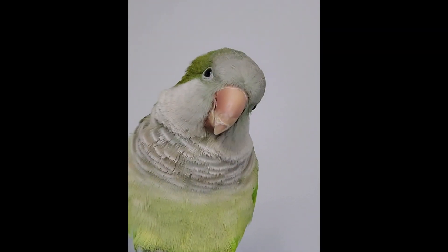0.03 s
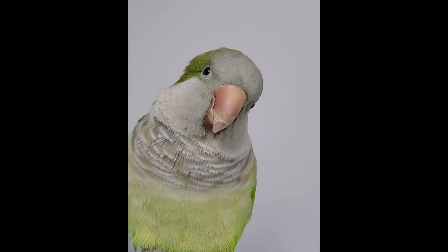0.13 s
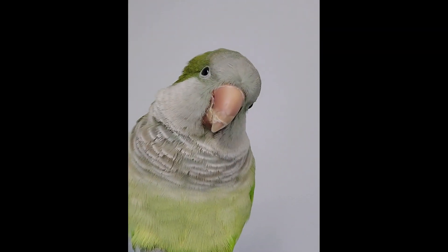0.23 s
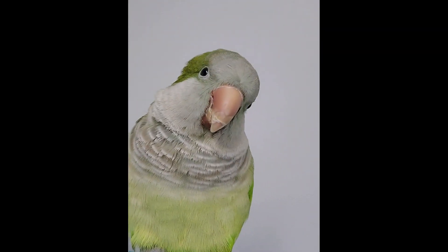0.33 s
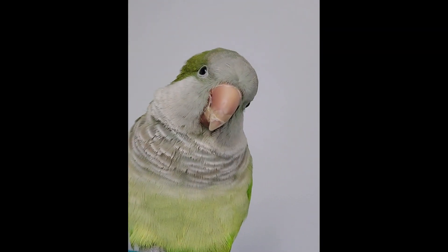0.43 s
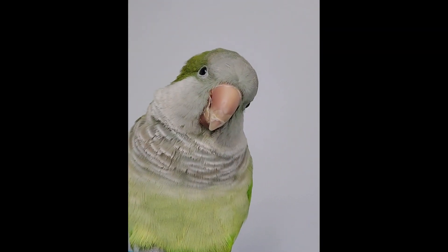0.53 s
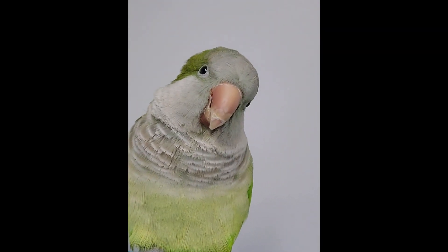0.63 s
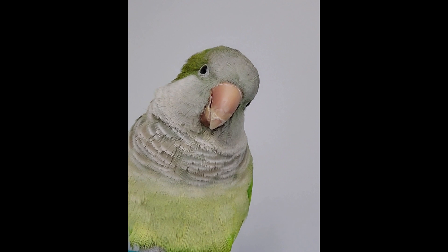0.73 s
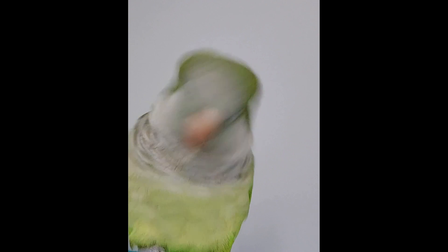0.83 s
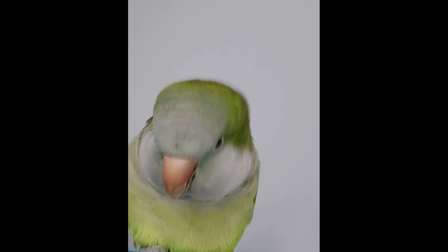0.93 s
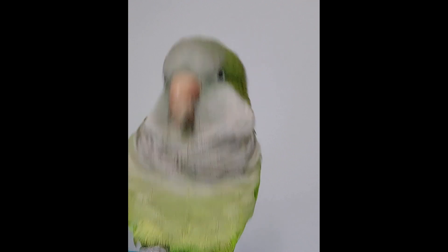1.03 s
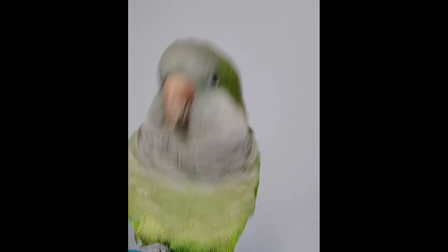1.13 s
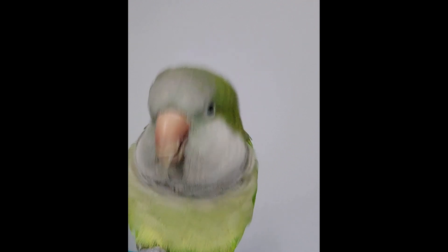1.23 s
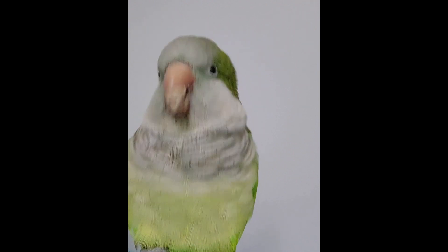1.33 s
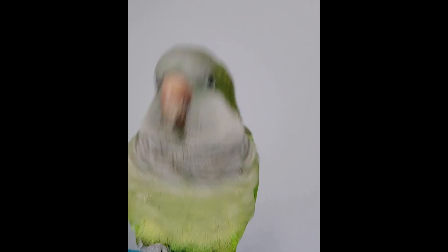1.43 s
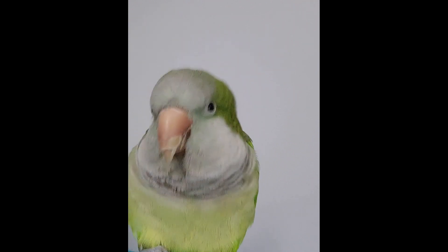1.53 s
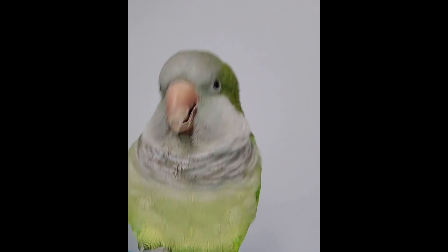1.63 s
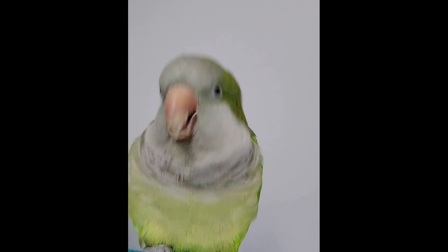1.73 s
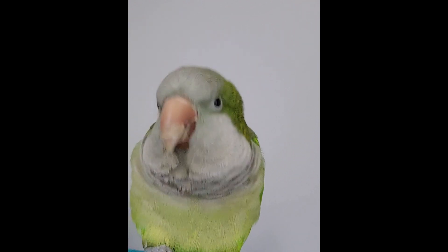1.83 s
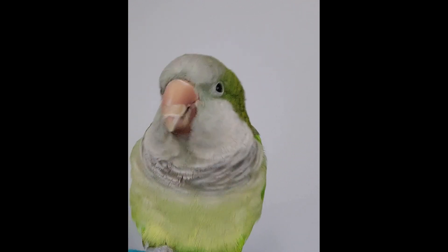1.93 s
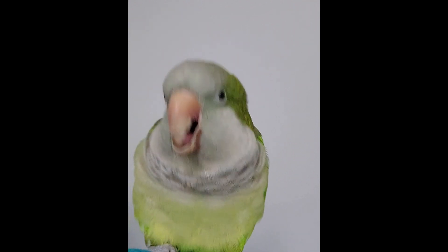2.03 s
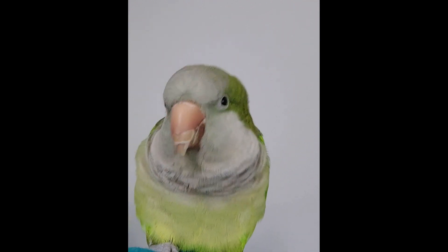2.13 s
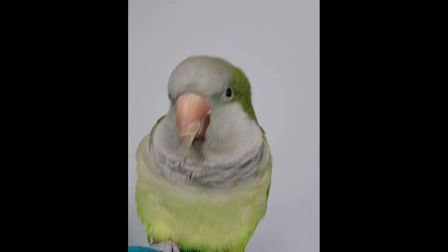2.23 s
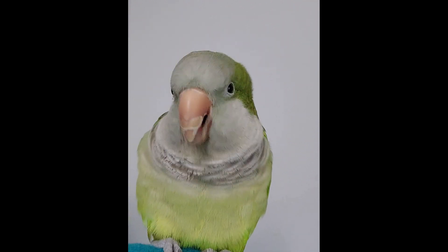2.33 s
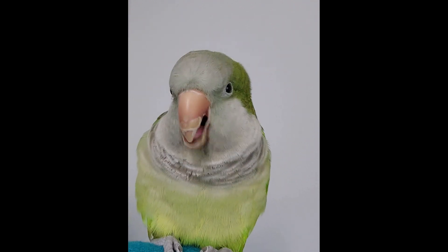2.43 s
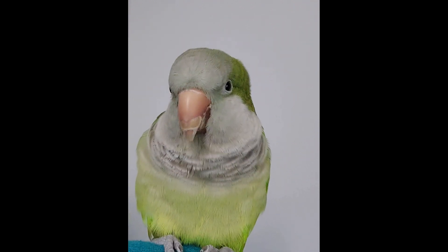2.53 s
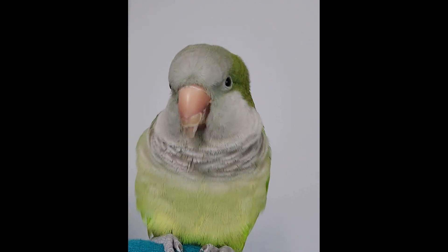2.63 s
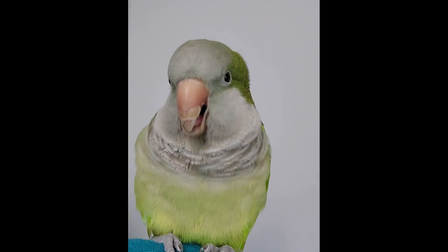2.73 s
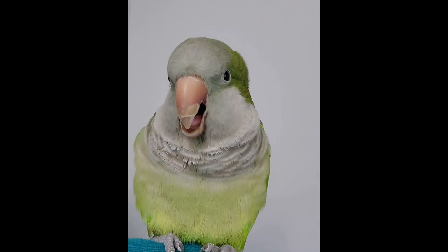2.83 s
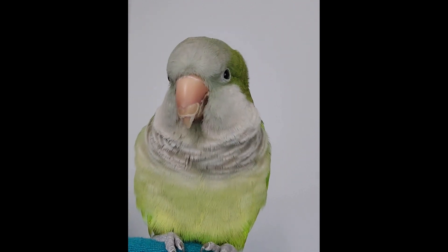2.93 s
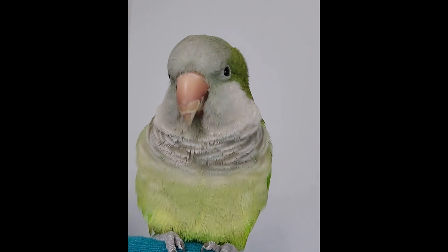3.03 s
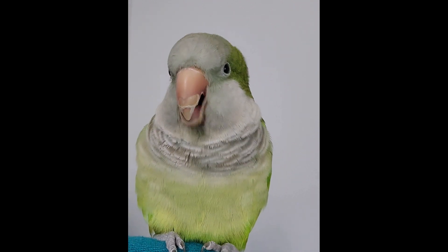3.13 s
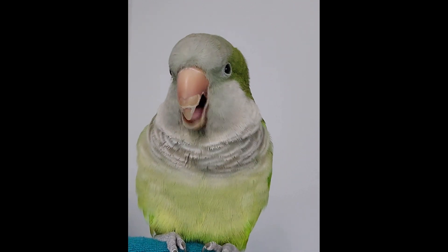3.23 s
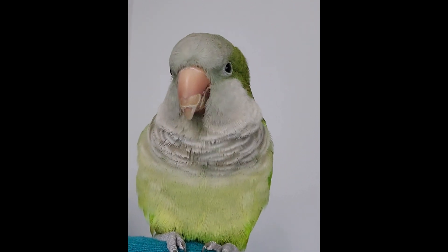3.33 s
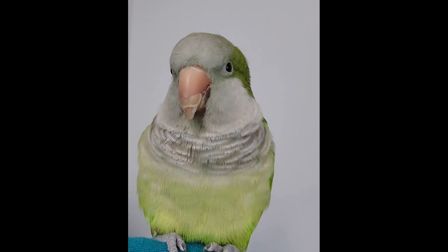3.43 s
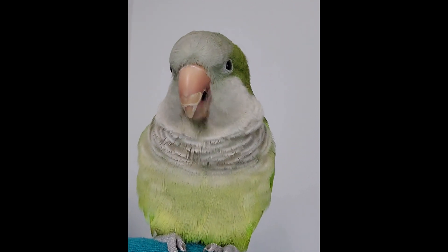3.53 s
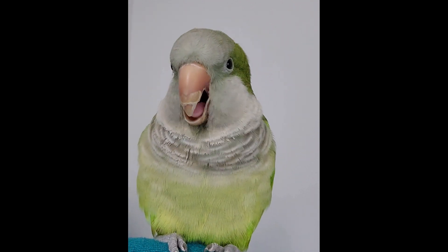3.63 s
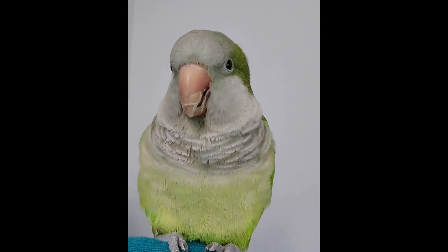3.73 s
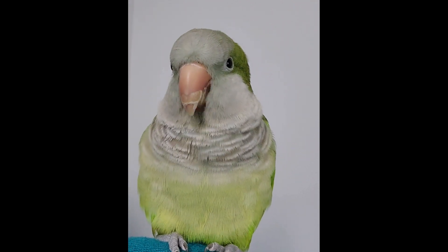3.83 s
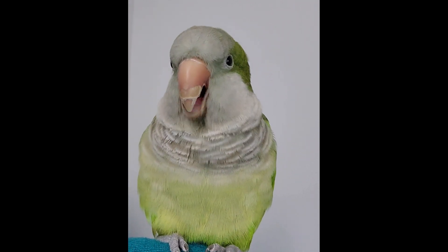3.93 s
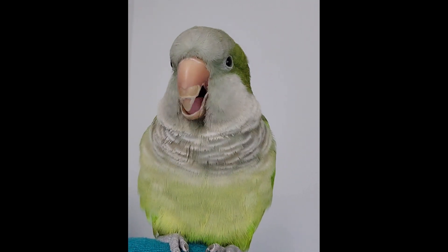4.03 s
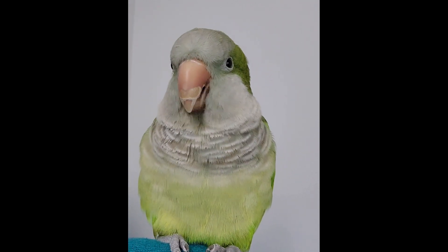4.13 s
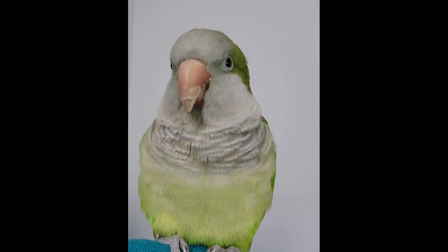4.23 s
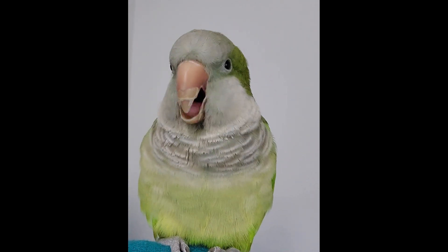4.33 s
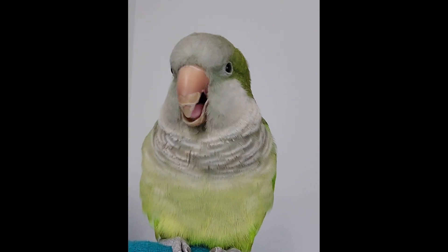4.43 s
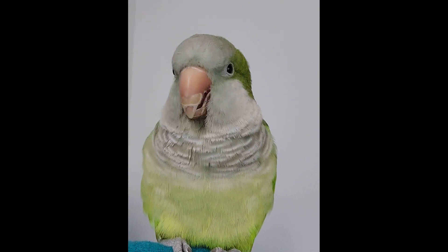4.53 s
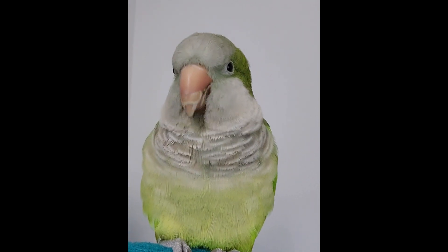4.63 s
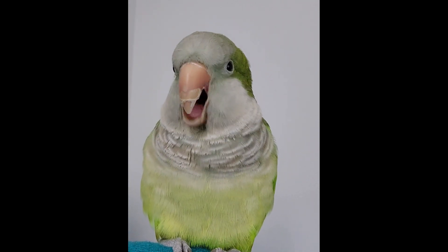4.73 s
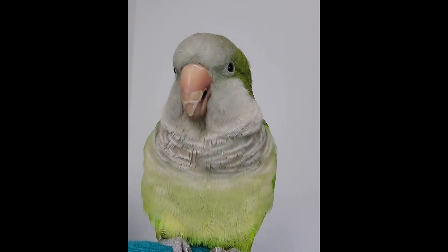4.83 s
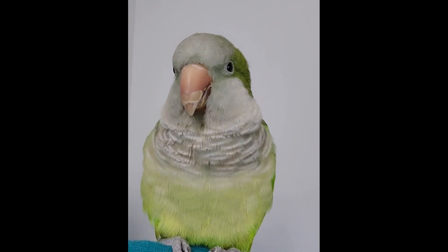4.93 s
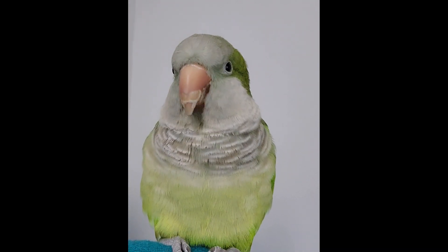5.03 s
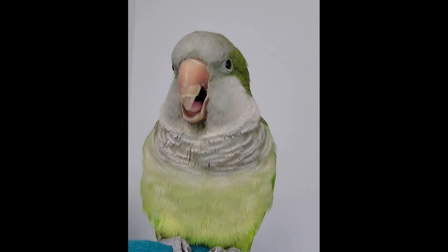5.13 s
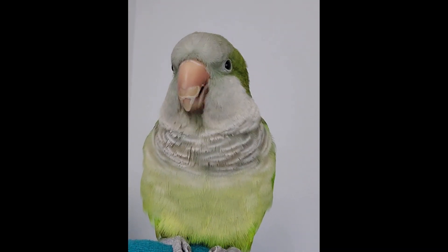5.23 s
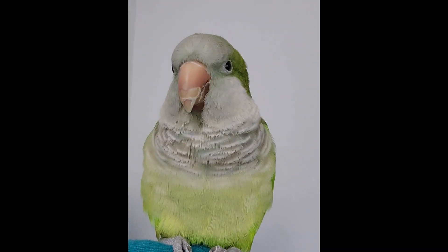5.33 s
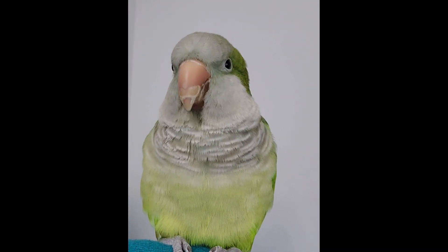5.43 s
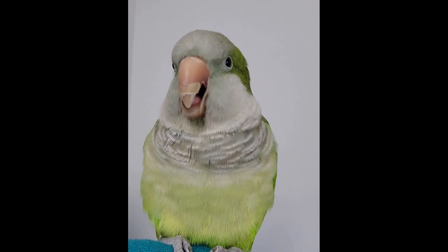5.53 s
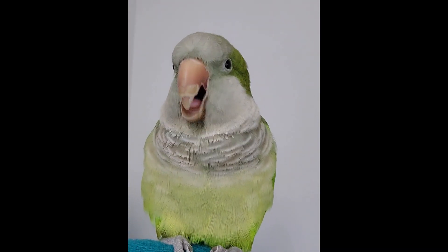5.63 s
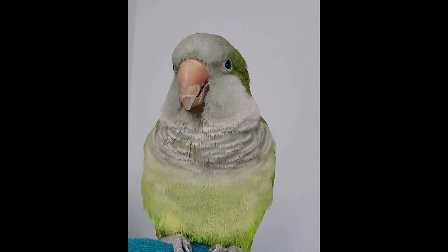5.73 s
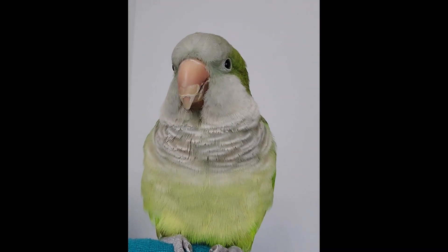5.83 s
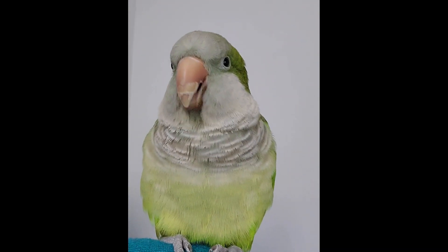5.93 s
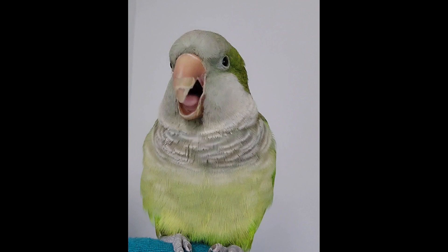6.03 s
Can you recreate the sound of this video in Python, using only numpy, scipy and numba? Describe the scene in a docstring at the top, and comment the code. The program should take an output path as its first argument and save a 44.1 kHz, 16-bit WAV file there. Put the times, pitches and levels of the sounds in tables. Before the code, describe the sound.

A small parrot gives a fast, regular run of short harsh squawks, close by in a quiet room.

```python
"""A small parrot gives fourteen harsh squawks, close to a phone in a quiet furnished room.
Each is a train of sharp syrinx pulses, rung through throat and beak; the pitch arches up, then sags
into a rasp. Nearby surfaces and a short room tail colour the voice.
A faint rumble, hiss and whine lie underneath."""
import sys
import numpy as np
from scipy import signal
from scipy.fft import rfft, irfft, next_fast_len
from scipy.io import wavfile
from scipy.ndimage import uniform_filter1d
from numba import njit

SR = 44100
rng = np.random.default_rng(int(sys.argv[2]) if len(sys.argv) > 2 else 0)


def to_wav(sig):
    """Store sig (one row per channel, or 1-D mono) as 16-bit WAV at the path in sys.argv[1].

    Samples outside -1..1 are clipped; the rate is SR.
    """
    pcm = np.clip(np.atleast_2d(sig), -1, 1) * 32767
    pcm = np.round(pcm).astype(np.int16)
    wavfile.write(sys.argv[1], SR, pcm.T)  # frames by channels


N = 268921
TIME_S = np.arange(N) / SR
FFT_SIZE = next_fast_len(N + SR, True)
FREQ_HZ = np.arange(FFT_SIZE // 2 + 1) * SR / FFT_SIZE


def undb(db):
    """Decibels to gain."""
    return 10 ** (np.asarray(db) / 20)


def curve_db(points):
    """Interpolate (freq_hz, gain_db) points on a log-frequency axis."""
    hz, db = np.transpose(points)
    return np.interp(np.log(FREQ_HZ + 1), np.log(hz), db)


def minimum_phase(gain_db):
    """Response that rings after a pulse, never before."""
    cepstrum = irfft(gain_db * np.log(10) / 20, FFT_SIZE)
    cepstrum[1:FFT_SIZE // 2] *= 2
    cepstrum[FFT_SIZE // 2 + 1:] = 0
    return np.exp(rfft(cepstrum))


def delay(lag_s):
    """Response of a pure delay."""
    return np.exp(-2j * np.pi * FREQ_HZ * lag_s)


def filtered(x, response):
    """Apply a frequency response."""
    return irfft(rfft(x, FFT_SIZE) * response, FFT_SIZE)[..., :N]


def unit_rms(x, window_samples=900):
    """Hold the running rms at 1."""
    power = uniform_filter1d(uniform_filter1d(x * x, window_samples), window_samples)
    return x / np.sqrt(np.abs(power) + 1e-12)


def wobble(rate_hz):
    """Low-passed noise, standard deviation 1."""
    x = signal.sosfilt(signal.butter(2, rate_hz, fs=SR, output="sos"), rng.standard_normal(N))
    return x / x.std()


def ease(time_s, span_s, curve=2):
    """Rise from 0 to 1 over the span, then hold."""
    return 1 - np.clip(1 - time_s / span_s, 0, 1) ** curve


@njit
def resonator(x, centre_hz, width_hz):
    """State-variable band-pass, unity gain at its moving centre."""
    y, band_state, low_state = np.empty(len(x)), 0., 0.
    for i in range(len(x)):
        g = np.tan(np.pi * centre_hz[i] / SR)
        damping = width_hz / centre_hz[i]
        band = (band_state + g * (x[i] - low_state)) / (1 + g * (g + damping))
        band_state = 2 * band - band_state
        low_state += 2 * g * band
        y[i] = damping * band
    return y


# background spectrum: freq_hz, relative_db
HUSH_SPECTRUM = [(20, -11.5), (40, -10.5), (60, -5), (110, -13.5), (190, -21.5), (320, -15), (500, -20.5),
                 (2000, -24.5), (3300, -28.5), (4300, -33.5), (6200, -32.5), (7500, -48.5), (16000, -60)]
# drift of hiss and whine: time_s, gain_db
HISS_DRIFT = [(0, -2), (1.5, 2), (2.5, -1.5), (6.1, -6)]

def hush(level_db=-69.5, side_db=-8, flicker_db=1, pan_db=-2.0, rumble_hz=200):
    """Rumble and fainter hiss of the home, mostly alike in both channels."""
    mid, side = filtered(rng.standard_normal((2, N)), undb(curve_db(HUSH_SPECTRUM)))
    sign = np.array([[1], [-1]])
    stereo = (mid + undb(side_db) * side * sign) / mid.std() * undb(sign * pan_db / 2)
    rumble = filtered(stereo, 1 / (1 + (FREQ_HZ / rumble_hz) ** 2))
    hiss = (stereo - rumble) * undb(np.interp(TIME_S, *np.transpose(HISS_DRIFT)))
    return (rumble + hiss) * undb(level_db + flicker_db * wobble(7.9))


def whine(pitch_hz=4330, level_db=-91.5):
    """Thin, slightly unsteady tone whose level follows the hiss."""
    cycles = np.cumsum(pitch_hz * (1 + .002 * wobble(30))) / SR
    drift_db = np.interp(TIME_S, *np.transpose(HISS_DRIFT))
    return np.sqrt(2) * np.sin(2 * np.pi * cycles) * undb(level_db + drift_db)


# reverberation bands: freq_hz, t60_s, gain_db
ROOM_BANDS = [(300, 0.57, -32), (1200, 0.15, -22.5), (3500, 0.27, -18.5), (7000, .33, -29),
              (14000, 0.2, -30)]

def room_tail(voice, build_s=0.0027):
    """Diffuse reverberation, different in each channel, longest in the bass."""
    band_hz, t60_s, gain_db = np.transpose(ROOM_BANDS)
    t = TIME_S[:SR // 2]
    noise = rfft(rng.standard_normal((2, len(t))))
    log_freq = np.log(np.fft.rfftfreq(len(t), 1 / SR) + 1)
    impulse = 0
    for weights, band_t60_s, gain in zip(np.eye(len(band_hz)), t60_s, undb(gain_db)):
        decay = np.exp(-np.log(1000) * t / band_t60_s) * (1 - np.exp(-(t / build_s) ** 2))
        band = irfft(noise * np.interp(log_freq, np.log(band_hz), weights), len(t))
        impulse = impulse + gain * band * decay / np.sqrt(np.sum(decay ** 2))
    return filtered(voice, rfft(impulse, FFT_SIZE))


def scatter(voice, level_db=-13, t60_s=0.13, first_s=0.0053, highpass_hz=1800):
    """Body, perch and phone scatter the short waves and blur each pulse."""
    t = TIME_S[:SR // 10]
    impulse = rng.standard_normal((2, len(t))) * np.exp(-np.log(1000) * t / t60_s) * (t > first_s)
    impulse /= np.sqrt(np.sum(impulse ** 2, axis=1, keepdims=True))
    highpass = FREQ_HZ / np.hypot(FREQ_HZ, highpass_hz)
    return undb(level_db) * filtered(voice, rfft(impulse, FFT_SIZE) * highpass)


# balance of the two microphone ports: freq_hz, left_minus_right_db
PORT_BALANCE = [(300, 1), (700, 7.5), (1200, 5.5), (1600, 3.5), (2350, -3), (2750, 8), (3100, -3.5),
                (3500, 6), (4200, 3.5), (4800, -6), (6400, -17.5), (7100, 12), (7900, 6.5), (9400, 15.5),
                (12200, 1.5), (15000, -3.5)]
# echoes off perch, wall and table: delay_s, left_db, right_db
REFLECTIONS = [(.0023, -16.5, -15), (.0052, -21.5, -19), (.0087, -26, -13), (0.0135, -18, -12)]

def near_field(voice, right_lag_s=0.0002511):
    """Direct sound reaches the left port first; close reflections follow."""
    balance_db = curve_db(PORT_BALANCE)
    mean_db = 10 * np.log10(np.cosh(balance_db * np.log(10) / 20))
    left = minimum_phase(balance_db / 2 - mean_db)
    right = minimum_phase(-balance_db / 2 - mean_db) * delay(right_lag_s)
    echoes = sum(undb([[left_db], [right_db]]) * delay(delay_s)
                 for delay_s, left_db, right_db in REFLECTIONS)
    return filtered(voice, np.array([left, right]) * (1 + echoes))


# overall slope of the voice: freq_hz, gain_db
VOICE_SLOPE = [(200, -44.5), (450, -21.5), (620, -18), (800, -2), (1100, -2.5), (2200, -5), (3600, -5.5),
               (5200, 1), (8000, -8.5), (10000, -8), (16000, -14.5)]
# peaks and hollows of windpipe and head: centre_hz, width_hz, gain_db
WINDPIPE_PEAKS = [(1410, 280, 4.5), (2030, 170, -4), (2340, 180, 7), (2620, 170, -4), (3100, 200, 2),
                  (4130, 260, 3), (5100, 200, -3), (5850, 400, -5), (7050, 400, 5), (8050, 400, -5),
                  (9500, 700, 2), (13550, 650, -24), (14900, 1100, 7)]
# bounces along the windpipe: round_trip_s, reflected_share
WINDPIPE_BOUNCES = [(.00035, 0.7), (.00058, 0.43)]

def windpipe():
    """Static response of the airway; repeated bounces spread each pulse in time."""
    peaks_db = sum(gain_db / (1 + (2 * (FREQ_HZ - centre_hz) / width_hz) ** 2)
                   for centre_hz, width_hz, gain_db in WINDPIPE_PEAKS)
    response = minimum_phase(curve_db(VOICE_SLOPE) + peaks_db)
    for round_trip_s, share in WINDPIPE_BOUNCES:
        trip = delay(round_trip_s)
        response = response * (trip - share) / (1 - share * trip)  # all-pass
    return response


# throat resonances and side-cavity hollow: shut_hz, open_hz, width_hz, gain_db
THROAT_FORMANTS = [(1610, 3197, 190, 16), (2730, 4310, 490, 15), (1090, 1800, 370, -6.5)]
# beak resonances and hollow: shut_hz, open_hz, width_hz, gain_db
BEAK_FORMANTS = [(4750, 7530, 100, 13), (6860, 11940, 640, 12), (13000, 15400, 500, 3),
                 (4500, 5500, 400, -3)]

def throat_and_beak(x, throat_opening, beak_opening):
    """Resonances in series, each rising as its cavity opens from 0 to 1."""
    for formants, opening in (THROAT_FORMANTS, throat_opening), (BEAK_FORMANTS, beak_opening):
        for shut_hz, open_hz, width_hz, gain_db in formants:
            centre_hz = shut_hz + (open_hz - shut_hz) * np.clip(opening, 0, 1)
            x = x + (undb(gain_db) - 1) * resonator(x, centre_hz, float(width_hz))
    return x


# lone syrinx pulses before the first squawk: start_s, pulse_db
CREAKS = [(1.003, -30), (1.0158, -17)]

def creaks(opening=0.34, lowpass_hz=7000):
    """The syrinx snaps twice into a partly open throat as it starts up."""
    pulses = np.full(N, 1e-18)
    for start_s, pulse_db in CREAKS:
        pulses[int(start_s * SR)] = undb(pulse_db)
    held = np.full(N, opening)
    rung = throat_and_beak(pulses, held, held)
    return signal.sosfilt(signal.butter(1, lowpass_hz, fs=SR, output="sos"), rung)


# stretches that are hoarse at any pitch: start_s, end_s, roughness
HOARSE_SPANS = [(1.036, 1.068, 0.3), (1.304, 1.371, 0.8), (3.522, 3.581, .5), (4.26, 4.312, .3),
                (4.633, 4.702, .9), (4.786, 4.837, 0.7), (5.064, 5.117, 0.9)]

def syrinx(pitch_hz, rough_below_hz=460, firm_jitter=0.0014, slack_jitter=.04, quaver=.005,
           shimmer_db=-0.19, rasp_db=2.5, air_db=-21, slack_air_db=11):
    """A pulse and a puff per cycle, plus the smooth flow; slack membranes beat unevenly."""
    slack = 1 / (1 + np.exp(np.clip((pitch_hz - rough_below_hz) / 40, -20, 20)))
    hoarse = sum(roughness * ((TIME_S > start_s) & (TIME_S < end_s))
                 for start_s, end_s, roughness in HOARSE_SPANS)
    slack = np.maximum(slack, uniform_filter1d(hoarse, size=600))
    jitter = (firm_jitter + slack_jitter * slack) * wobble(260) + quaver * wobble(45)
    cycles = np.cumsum(pitch_hz * (1 + jitter)) / SR
    from_closure_samples = (cycles - np.round(cycles)) * SR / pitch_hz
    pulses = np.sinc(.8 * from_closure_samples) * np.exp(-(from_closure_samples / 7) ** 2)
    pulses *= undb((shimmer_db + rasp_db * slack) * wobble(170))
    puffs = rng.standard_normal(N) * np.exp(-(cycles % 1) / 1.1)
    flow = np.sqrt(2) * np.sin(2 * np.pi * cycles)
    return unit_rms(pulses) + undb(air_db + slack_air_db * slack) * unit_rms(puffs), flow


SLACK_HZ, CROAK_FALL_S, CROAK_DROP_SHARE = 289, .02, 0.65
ATTACK_DEPTH_DB, ATTACK_CURVE = 17.5, 2.5
DYING_S, DYING_DB = 0.015, 8  # the air runs out
CLIMB_DB_PER_HZ, FLUTTER_DB, FLUTTER_HZ = 0.0287, 0.6, 59
THROAT_REST, THROAT_SHUT_S, THROAT_OPENING_PER_HZ = 0.082, 0.072, 0.00037
BEAK_REST, BEAK_SHUT_S, BEAK_LAG_S, BEAK_SAG_PER_S = .22, 0.084, 0.016, 2.3
TREBLE_SHUT_DB, TREBLE_LAG_S, TREBLE_SHUT_S = -27.5, 0.0084, 0.05
LOW_SHUT_DB, LOW_RISE_S, LOW_FADE_S, LOW_SWELL_DB = -12, 0.014, 0.084, 9.5

# squawks, each timed from its own start: start_s, length_s, onset_hz, knee_s, knee_hz, crest_s,
# crest_hz, sag_s, sag_shape, croak_s, base_db, attack_s, hold_s, release_db_per_s, open_s,
# throat_opening, beak_opening, treble_relative_db, low_base_db
SQUAWKS = [(1.024, 0.15, 599.4, 0.022, 476.3, 0.072, 698, 0.067, 5.8, 0.14, -16, 0.0086, 0.068, 684, 0.01, 0.29, 0.78, -14.5, -31.5),
           (1.304, 0.21, 569.7, 0.037, 408.0, 0.078, 602.0, 0.081, 2.9, 0.18, -18, 0.025, 0.097, 400, 0.013, 0.35, 0.81, -7, -35.5),
           (1.633, 0.18, 397.9, 0.047, 692.7, 0.096, 732.0, 0.039, 1.7, 0.15, -16.5, 0.013, 0.12, 613, 0.079, 0.66, 0.83, -4, -39.5),
           (1.944, 0.2, 450.8, 0.013, 560.2, 0.084, 703.0, 0.084, 1.9, 0.158, -18.5, 0.024, 0.12, 320, 0.088, 0.77, 0.7, -4, -39),
           (2.315, 0.23, 418.5, 0.017, 567.7, 0.062, 628.0, 0.112, 1.4, 0.146, -17, 0.021, 0.078, 165.0, 0.072, 0.77, 0.76, -4.5, -41),
           (2.713, 0.22, 360.8, 0.031, 607.1, 0.096, 553.0, 0.058, 2, 0.16, -17.5, 0.03, 0.11, 252, 0.085, 0.9, 0.97, -3.5, -43),
           (3.104, 0.23, 464.9, 0.042, 576.5, 0.123, 633.0, 0.063, 0.9, 0.205, -18.5, 0.046, 0.14, 257, 0.11, 0.87, 0.95, -5, -41.0),
           (3.523, 0.2, 470.7, 0.074, 574.7, 0.091, 711.0, 0.072, 2.3, 0.18, -18, 0.038, 0.13, 415, 0.085, 0.88, 0.94, -2, -41.0),
           (3.904, 0.18, 462, 0.038, 605.3, 0.093, 622.0, 0.205, 1.3, 0.168, -19.5, 0.038, 0.12, 277, 0.085, 0.86, 0.95, -2.5, -43.0),
           (4.266, 0.213, 469.4, 0.028, 564.3, 0.08, 691.0, 0.071, 1.8, 0.146, -17.5, 0.041, 0.085, 256, 0.083, 0.9, 0.94, -3.5, -44),
           (4.656, 0.23, 587.8, 0.074, 624.9, 0.109, 709.0, 0.053, 1.1, 0.195, -18.5, 0.064, 0.11, 232, 0.095, 0.88, 0.93, -4.5, -46),
           (5.083, 0.19, 554.2, 0.086, 615.6, 0.134, 710.0, 0.02, 1.2, 0.16, -18.2, 0.052, 0.12, 377.5, 0.082, 0.88, 0.92, -3.5, -43.5),
           (5.493, 0.21, 357.5, 0.023, 595.2, 0.059, 694.0, 0.097, 3.3, 0.158, -17.5, 0.04, 0.097, 284.6, 0.1, 0.87, 1, -4, -44),
           (5.916, 0.18, 341, 0.046, 536.8, 0.098, 569.0, 0.05, 2.4, 0.15, -21, 0.086, 0.12, 380.0, 0.096, 0.8, 0.87, -5.5, -46)]

def squawk_gestures(edge_s=0.00067):
    """Pitch arches, sags and croaks; effort rises, holds and lets go; throat and beak open and shut."""
    table = np.array(SQUAWKS)
    row = np.searchsorted(table[1:, 0] - .05, TIME_S)
    (start_s, length_s, onset_hz, knee_s, knee_hz, crest_s, crest_hz, sag_s, sag_shape, croak_s,
     base_db, attack_s, hold_s, release_db_per_s, open_s, throat_opening, beak_opening,
     treble_relative_db, low_base_db) = table[row].T
    age_s = np.clip(TIME_S - start_s, 0, length_s)
    left_s = length_s - age_s
    gate = np.clip((TIME_S - start_s) / edge_s + .5, 0, 1)
    gate *= np.clip((start_s + length_s - TIME_S) / edge_s + 1, 0, 1)

    climb_hz = onset_hz + (knee_hz - onset_hz) * ease(age_s, knee_s, 0.94)
    climb_hz += (crest_hz - knee_hz) * ease(age_s - knee_s, crest_s - knee_s, 0.99)
    tension = np.exp(-(np.maximum(age_s - crest_s, 0) / sag_s) ** sag_shape)
    tension *= 1 - CROAK_DROP_SHARE * ease(age_s - croak_s, CROAK_FALL_S)
    pitch_hz = uniform_filter1d(SLACK_HZ + (climb_hz - SLACK_HZ) * tension, size=600)

    level_db = base_db - ATTACK_DEPTH_DB * (1 - ease(age_s, attack_s, ATTACK_CURVE))
    level_db -= release_db_per_s * np.maximum(age_s - hold_s, 0)
    level_db -= DYING_DB * (1 - ease(left_s, DYING_S))
    level_db += CLIMB_DB_PER_HZ * (climb_hz - (knee_hz + crest_hz) / 2)
    level_db += FLUTTER_DB * wobble(FLUTTER_HZ)

    opened = ease(age_s, open_s)
    throat = THROAT_REST + (throat_opening - THROAT_REST) * opened * ease(left_s, THROAT_SHUT_S)
    throat += THROAT_OPENING_PER_HZ * (pitch_hz - crest_hz) * opened * throat_opening
    gape = ease(age_s, open_s + BEAK_LAG_S) * ease(left_s, BEAK_SHUT_S)
    beak = BEAK_REST + (beak_opening - BEAK_REST) * gape
    beak -= BEAK_SAG_PER_S * np.maximum(age_s - open_s - BEAK_LAG_S, 0)

    # a shut beak holds back the treble; a narrow throat favours the lowest harmonics
    treble_on = ease(age_s, attack_s + TREBLE_LAG_S) * ease(left_s, TREBLE_SHUT_S)
    treble_db = level_db + treble_relative_db + TREBLE_SHUT_DB * (1 - treble_on)
    low_on = ease(age_s, LOW_RISE_S) * ease(left_s, LOW_FADE_S)
    low_db = low_base_db + LOW_SWELL_DB * (1 - opened) + LOW_SHUT_DB * (1 - low_on)
    return gate, pitch_hz, level_db, throat, beak, treble_db, low_db


def parrot(low_hz=1650, treble_hz=8000, flow_db=-46, flow_swell=0.22, flow_cap_db=-7):
    """Pulses ring the airway in three bands; the fundamental hardly swells with effort."""
    gate, pitch_hz, level_db, throat, beak, treble_db, low_db = squawk_gestures()
    pulses, flow = syrinx(pitch_hz)
    rung = throat_and_beak(pulses, throat, beak)
    below_low, below_treble = (1 / (1 + (FREQ_HZ / hz) ** 16) for hz in (low_hz, treble_hz))
    crossover = np.array([below_low, below_treble - below_low, 1 - below_treble])
    low, mid, treble = filtered(rung, windpipe() * crossover)
    voice = undb(low_db) * unit_rms(low) + undb(level_db) * unit_rms(mid)
    voice += undb(treble_db) * unit_rms(treble)
    fundamental_db = np.minimum(flow_db + flow_swell * level_db, level_db + flow_cap_db)
    return gate * (voice + flow * undb(fundamental_db))


def scene():
    """The bird, its reflections and the background."""
    voice = parrot() + creaks()
    return near_field(voice) + scatter(voice) + room_tail(voice) + hush() + whine()


def record(dry, ceiling=0.62, lowpass_hz=15850):
    """The phone rounds the loudest pulses and cuts the top."""
    rounded = dry / (1 + (dry / ceiling) ** 6) ** (1 / 6)
    return signal.sosfilt(signal.ellip(10, .2, 80, lowpass_hz, fs=SR, output="sos"), rounded)


dry = scene()
out = record(dry)
to_wav(out)
```